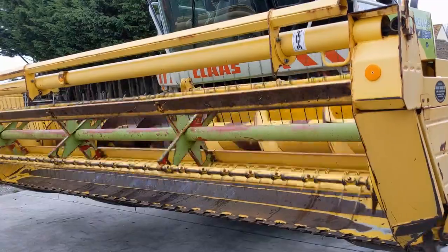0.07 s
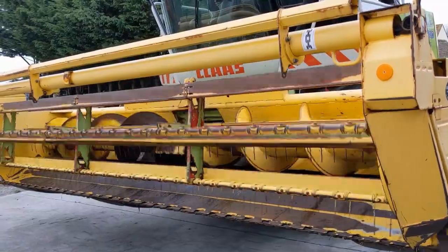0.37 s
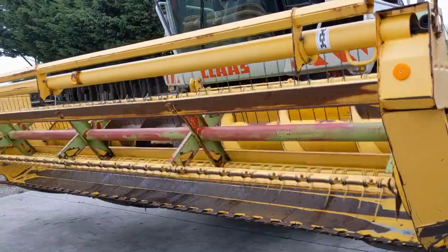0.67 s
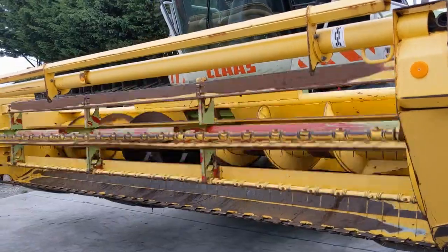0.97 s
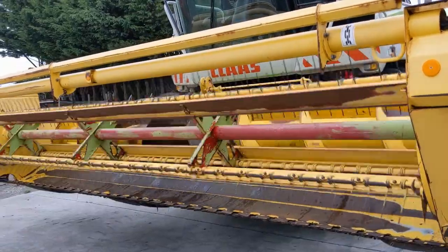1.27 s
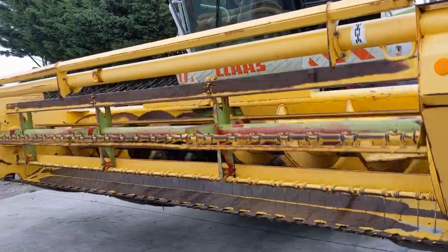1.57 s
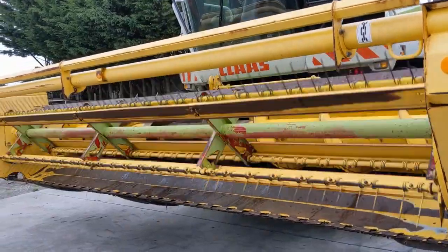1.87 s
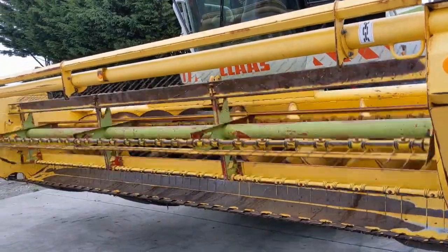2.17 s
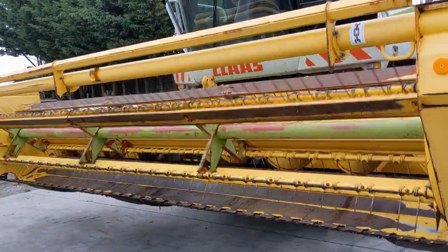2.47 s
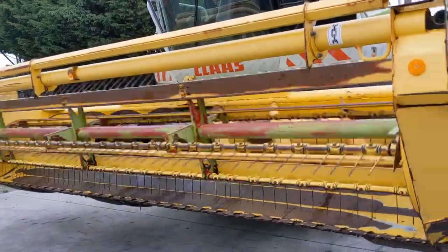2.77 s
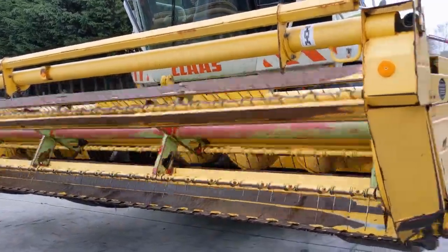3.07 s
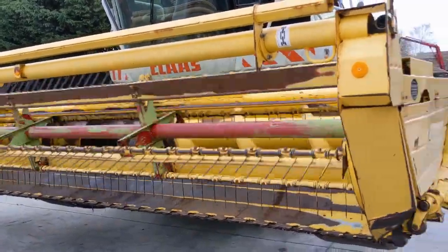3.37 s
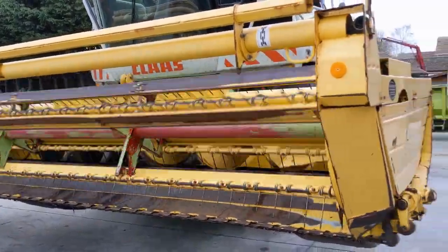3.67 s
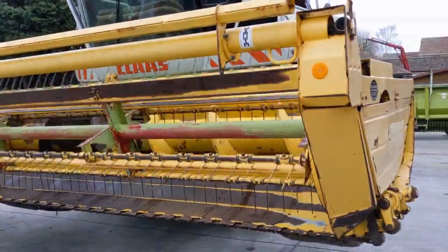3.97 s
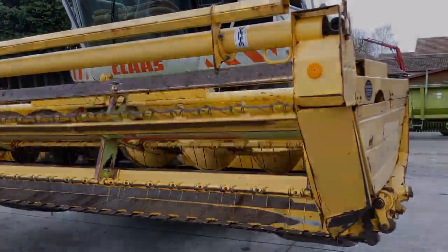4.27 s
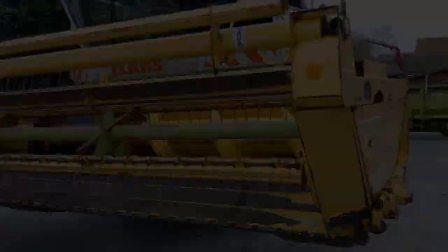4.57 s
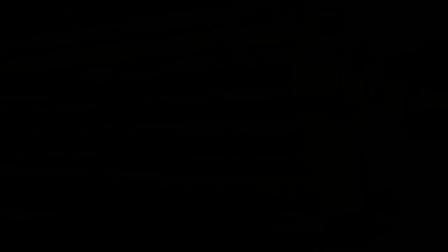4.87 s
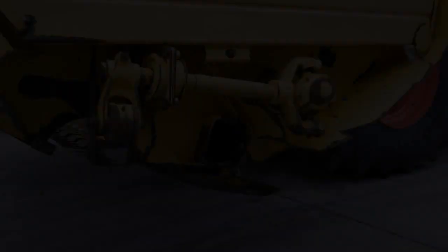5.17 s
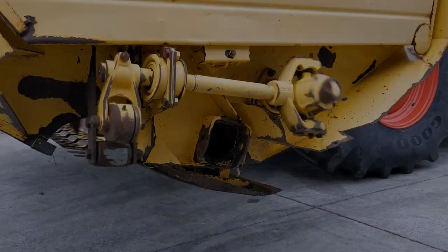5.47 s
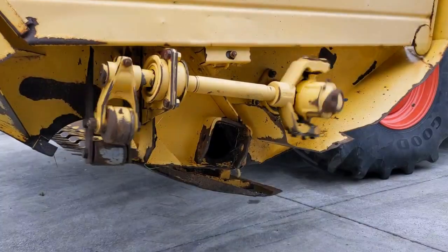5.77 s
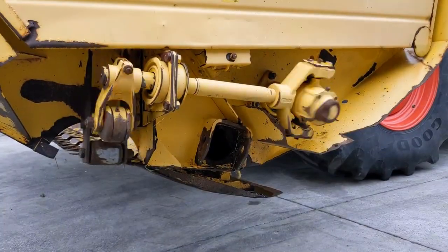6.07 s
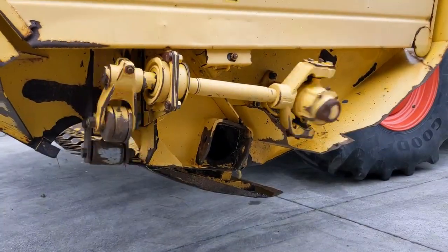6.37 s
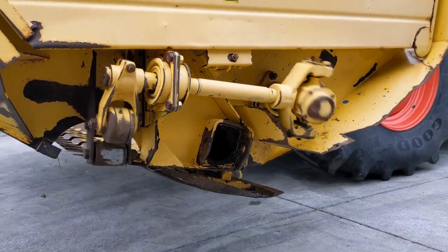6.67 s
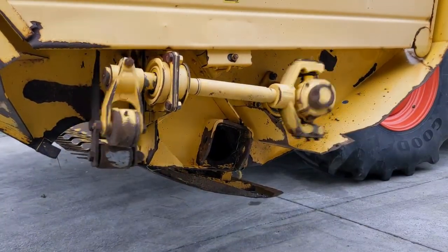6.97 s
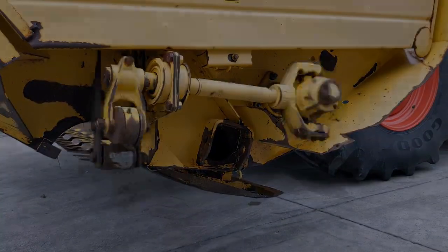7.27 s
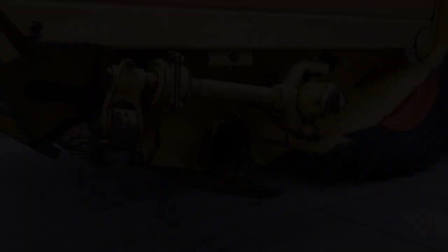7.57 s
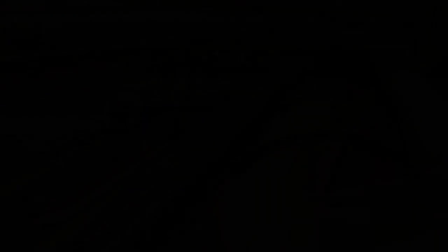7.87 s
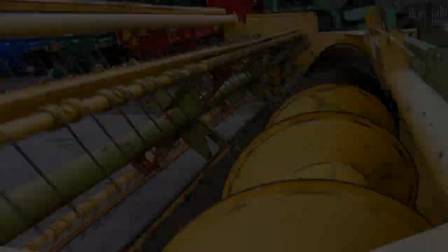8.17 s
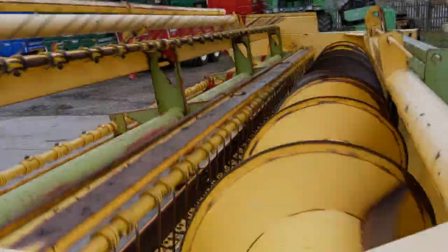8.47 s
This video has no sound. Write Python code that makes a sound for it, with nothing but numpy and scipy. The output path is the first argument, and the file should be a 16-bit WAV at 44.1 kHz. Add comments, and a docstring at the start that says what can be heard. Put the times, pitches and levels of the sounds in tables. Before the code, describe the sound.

A combine harvester's header runs empty in a concrete yard, heard close up from the front. From the start, a steady low engine hum and the drumming of steel panels sit under a dense rattle of chains, reel and auger. The cutter bar's knife scrapes out and back about six times a second, with a short, ringing metallic knock at every stroke, some catching a little harder. At about 5 seconds the sound cuts to silence. It returns at 5.4 seconds, now from the side, at the same pace but with crisper scrapes and more prominent knocking from the drive linkage. Around 7.8 seconds it stutters very briefly and cuts out at 7.9. At about 8.3 seconds the running machine comes back with one dull clunk from the steel trough, and the drone and clatter carry on until about 8.7 seconds.

```python
"""A concrete yard: a combine harvester's header runs empty, heard close up, once from in front and
twice from the side, with short silences between. The engine hums, the steel trough and panels drum,
chains, reel and auger rattle. The cutter bar's knife scrapes out and back six times a second,
knocking its drive linkage at every stroke. Near the end the trough clunks once."""
import sys
import numpy as np
from scipy import signal
from scipy.fft import rfft, irfft, next_fast_len
from scipy.io import wavfile
from scipy.ndimage import uniform_filter1d

SR = 44100
rng = np.random.default_rng(int(sys.argv[2]) if len(sys.argv) > 2 else 0)


def file_out(sig):
    """Save sig as 16-bit WAV at sys.argv[1]."""
    # one column per channel
    cols = np.atleast_2d(sig).T
    # limit, then scale
    lim = np.clip(cols, -1, 1)
    pcm = np.round(lim * 32767).astype(np.int16)
    wavfile.write(sys.argv[1], SR, pcm)


N = 379701
SHAFT_HZ, CRANK_HZ = 49.7, 6.04
MOVE_S = 5.2  # listener goes from front to side

# audible stretches: (start [s], fade-in [s], end [s], first outward stroke [s])
VIEWS = [(.047, .024, 5.029, .08), (5.396, .036, 7.9, 5.476), (8.283, .038, 8.7, 8.398)]


def undb(db):
    """Decibels to gain."""
    return 10 ** (np.asarray(db) / 20)


def level(x, db):
    """Scale to an rms level."""
    return x * undb(db) / np.sqrt(np.mean(x ** 2))


def per_bin(points):
    """Interpolate (frequency [Hz], value) points over log frequency, one value per FFT bin."""
    hz, value = np.transpose(points)
    bin_hz = np.fft.rfftfreq(next_fast_len(N), 1 / SR)
    return np.interp(np.log(bin_hz + 1e-3), np.log(hz), value)


def shape(x, gain):
    """Filter with one gain per FFT bin."""
    size = next_fast_len(N)
    return irfft(rfft(x, size) * gain, size)[..., :N]


def walk(rate_hz):
    """Smooth random drift, deviation near 1."""
    hold = int(SR / rate_hz)
    steps = np.repeat(rng.standard_normal(N // hold + 1), hold)
    return 1.21 * uniform_filter1d(uniform_filter1d(steps, hold), hold)[:N]


def contacts(per_s, spread_db):
    """Two independent trains of tiny metal contacts of random size."""
    hit = rng.random((2, N)) < per_s / SR
    return level(hit * rng.standard_normal((2, N)) * undb(spread_db * rng.standard_normal((2, N))), 0)


def stereo(x, spectrum, alike=1):
    """Colour two independent signals into left and right: the wide machine is alike only lower down."""
    # left-right likeness: (frequency [Hz], correlation [0-1])
    correlation = [(60, .96), (250, .93), (500, 0.96), (850, 0.99), (1150, .75), (1400, .15), (2400, 0.064),
                   (7500, 0.12), (9500, 0.42), (11000, 0.11)]
    likeness = np.clip(per_bin(correlation) * alike, 0, .99)
    gain = undb(per_bin(spectrum))
    mid = shape(x[0], gain * np.sqrt(1 + likeness))
    side = shape(x[1], gain * np.sqrt(1 - likeness))
    return level(np.array([mid + side, mid - side]), 0)


def steel(x, t60_s, ring_db):
    """Each contact sets off a brief wash of crowded treble modes in the steel frame."""
    t = np.arange(SR // 8) / SR
    wash = rng.standard_normal((2, len(t))) * np.exp(-np.log(1000) * t / t60_s)
    wash *= undb(ring_db) / np.sqrt(np.sum(wash ** 2, axis=1, keepdims=True))
    wash = signal.sosfilt(signal.butter(2, 3000, "high", fs=SR, output="sos"), wash)
    return level(x + signal.fftconvolve(x, wash, axes=1)[:, :N], 0)


def engine(front):
    """Hum: harmonics of the governed shaft speed, each wavering a little."""
    # harmonics: (shaft order, level [dB])
    front_orders = [(1, -26.5), (2, -29.5), (4, -25.5), (5, -44), (6, -29), (8, -44.5), (10, -40)]
    side_orders = [(1, -27.5), (2, -36.5), (4, -25.5), (6, -36), (8, -32.5)]

    def hum(orders, waver_db):
        phase = 2 * np.pi * np.cumsum(SHAFT_HZ * (1 + .0015 * walk(3))) / SR
        out = np.zeros(N)
        for order, db in orders:
            peak = np.sqrt(2) * undb(db + waver_db * walk(6.5))
            out += peak * np.sin(order * phase + 2 * np.pi * rng.random())
        return out

    return np.where(front, hum(front_orders, waver_db=2.1), hum(side_orders, waver_db=2.4))


def panels(front, repeat_share, db):
    """Thuds shake the sheet steel; part of the pattern repeats with each crank turn."""
    # trough and panel spectra: (frequency [Hz], relative level [dB])
    front_spectrum = [(22, -32), (38, -19.5), (47, -6), (58, -10.5), (80, 2.5), (120, -2.5), (134, 2.5),
                      (152, -2), (212, -6.5), (236, -1), (292, -3.5), (312, -7), (392, -6), (450, -23.5),
                      (900, -41)]
    side_spectrum = [(22, -32.5), (38, -18), (47, -10), (62, -3.5), (85, 0.5), (115, 3), (150, -2.5),
                     (178, -2), (255, -3), (305, -4.5), (340, -4.5), (440, -16), (490, -26.5), (900, -42.5)]
    thuds = contacts(per_s=2500, spread_db=1)
    repeating = contacts(per_s=2500, spread_db=3)[:, np.arange(N) % int(SR / CRANK_HZ)]
    shake = np.sqrt(1 - repeat_share) * thuds + np.sqrt(repeat_share) * level(repeating, 0)
    ahead = stereo(shake, front_spectrum)
    beside = stereo(shake, side_spectrum, alike=.88)
    return np.where(front, ahead, beside) * undb(db)


def chains(front, front_db, side_db, flutter_db):
    """Links, reel tines and auger flights tick densely and unevenly."""
    # rattle: (frequency [Hz], relative level [dB])
    spectrum = [(250, -9.5), (450, -1), (700, -2.5), (1150, -4), (1500, -9.5), (2100, -9.5), (2450, -4.5),
                (3200, -10.5), (4400, -14.5), (5500, -23.5), (8000, -25), (9700, -29.5), (11000, -35.5),
                (15000, -52.5)]
    ticks = contacts(per_s=7000, spread_db=2) * undb(flutter_db * walk(45))
    rattle = stereo(steel(ticks, t60_s=.033, ring_db=-12), spectrum)
    return rattle * undb(np.where(front, front_db, side_db))


def crank_strokes():
    """Each crank turn drives the knife out and back. Rows: (time [s], scrape [dB], knock [dB])."""
    # outward stroke strength: (time [s], scrape [dB], knock [dB])
    drift = [(0, -20.7, -21.3), (1.2, -21.7, -23), (2.95, -22.9, -23.5), (3.35, -22.4, -18.7),
             (4.5, -24.5, -23), (5.0, -22.7, -21.5), (5.5, -20.5, -17.8), (5.9, -23.8, -21),
             (6.6, -24, -20.3), (7.3, -25.3, -20.7), (7.85, -28, -21.5), (8.4, -22.5, -20),
             (8.6, -27, -20.5)]
    # knife catches harder: (time [s], extra scrape [dB], extra knock [dB])
    hard_strokes = [(.57, 2, 0), (1.07, 1.5, 0), (1.41, 2.5, .5), (3.06, 2, 2), (3.31, 0, 2), (4.05, 3, 0),
                    (4.14, 1, 3), (5.64, 2.5, 1.5), (6.38, 2.5, 0), (7.79, 2.5, 1)]
    # return stroke: (delay [s], extra scrape [dB], extra knock [dB])
    return_front, return_side = (.0845, -1.5, -1.1), (.078, 2.2, 2.0)
    scatter_db = [.7, 1.0]  # scrape, knock
    drift_s, scrape_db, knock_db = np.transpose(drift)
    rows = []
    for _, _, end_s, first_s in VIEWS:
        for s in np.arange(first_s, end_s - .05, 1 / CRANK_HZ):
            outward = np.array([s, np.interp(s, drift_s, scrape_db), np.interp(s, drift_s, knock_db)])
            rows += [outward, outward + (return_front if s < MOVE_S else return_side)]
    rows = np.array(rows)
    rows[:, 1:] += rng.standard_normal((len(rows), 2)) * scatter_db
    for s, *extra_db in hard_strokes:
        nearest = np.argmin(np.abs(rows[:, 0] - s))
        rows[nearest, 1:] += extra_db
    return rows


def swells(times_s, peaks_db, rise_s, fall_s, out_stretch, roundness):
    """A swell of force per stroke; outward strokes drag longer than returns."""
    t, force = np.arange(N) / SR, np.zeros(N)
    for k, (s, db) in enumerate(zip(times_s, peaks_db)):
        near = slice(max(int(s * SR) - SR // 10, 0), int(s * SR) + SR // 10)
        age = (t[near] - s) / (1 if k % 2 else out_stretch)
        width_s = np.where(age < 0, rise_s, fall_s)
        force[near] += undb(db) * np.exp(-np.abs(age / width_s) ** roundness)
    return force


def knife(strokes, front, front_db, side_db, chatter_db):
    """Knife sections scrape through the guard fingers: catch, chatter, ease off."""
    # scrape spectra: (frequency [Hz], relative level [dB])
    front_spectrum = [(400, -9.5), (800, -7.5), (1150, -3), (1500, -10.5), (2450, -3), (3400, -7),
                      (4450, -6.5), (5000, -9.5), (5500, -6.5), (6400, -11.5), (8200, -10.3), (10100, -9),
                      (10700, -15.5), (13500, -17.3), (16000, -30.5)]
    side_spectrum = [(400, -14), (800, -7), (1200, 0), (1550, -10), (2400, -2), (3400, -5.5), (4450, -3),
                     (5700, -8), (6400, -11), (8000, -12.5), (10100, -12), (10800, -16), (13500, -21),
                     (16000, -26.5)]
    times_s, scrape_db, _ = strokes.T
    grit = steel(contacts(per_s=14000, spread_db=1.7), t60_s=.022, ring_db=-4)
    grit *= undb(chatter_db * walk(180))
    ahead = swells(times_s - .0055, scrape_db + front_db,
                   rise_s=.016, fall_s=.025, out_stretch=1.11, roundness=1.45)
    beside = swells(times_s - .003, scrape_db + side_db,
                    rise_s=.0165, fall_s=.018, out_stretch=1.07, roundness=1.18)
    return np.where(front, stereo(grit, front_spectrum) * ahead, stereo(grit, side_spectrum) * beside)


def linkage(strokes, front, front_db, side_db, clack_db, lag_s, idle_db):
    """Joint play is taken up in a burst of knocks at each stroke; knife and linkage ring on."""
    # dry clack of the joints: (frequency [Hz], relative level [dB])
    clack_spectrum = [(700, -17.5), (1150, -5), (1600, -10), (2500, 4), (4400, -0.5), (5800, -5),
                      (7000, -12), (10000, -20.5), (15000, -29.5)]
    # knife and linkage modes: (frequency [Hz], t60 [s], front [dB], side [dB], outward bias [dB])
    modes = [(1900, .03, -12.5, -12, 1.5), (2070, 0.05, -15, -11, 0.5), (2378, .06, 1.5, 3.5, 2),
             (2505, 0.023, 0, -6.5, 0), (2976, .1, -6.5, 4, 4.5), (3134, 0.05, -3.5, 1, -4.5),
             (3778, .03, -3.5, -1.5, 0), (3897, .035, -8.5, -5.5, 2), (4440, 0.04, -5.5, -5, -0.5),
             (5330, 0.026, -13, -10.5, 2), (5600, 0.025, -18, -13, -0.5), (7190, .03, -11, -7.5, -2),
             (8180, .012, -16.5, -12, 1.5), (8970, 0.014, -17, -17, 3.5), (9600, .015, -15.5, -16, -0.5)]
    times_s, _, knock_db = strokes.T
    force = swells(times_s + lag_s, knock_db, rise_s=.0045, fall_s=.012, out_stretch=1.28, roundness=1.3)
    out = stereo(contacts(per_s=6000, spread_db=0), clack_spectrum) * force * undb(clack_db)
    # in front, the loose knife keeps tapping between strokes
    knocks = contacts(per_s=4000, spread_db=1.3) * (force + front * undb(idle_db))
    # out (+1) and back (-1) strike opposite joint faces, favouring different modes
    direction = np.interp(np.arange(N) / SR, times_s, (-1) ** np.arange(len(times_s)))
    for hz, t60_s, ahead_db, beside_db, bias_db in modes:
        pole = np.exp(2j * np.pi * hz / SR - np.log(1000) / (t60_s * SR))
        ring = signal.lfilter([1], [1, -pole], knocks * undb(bias_db * direction)).imag
        out += level(ring, 0) * undb(np.where(front, ahead_db + front_db, beside_db + side_db))
    return out


def clunk(start_s, decay_s, gain_db):
    """One heavier, dull knock in the trough."""
    # struck trough: (frequency [Hz], relative level [dB])
    spectrum = [(150, -17), (330, -1), (600, -6.5), (1100, -6), (1700, -12), (4000, -45)]
    age = np.maximum(np.arange(N) / SR - start_s, 0) / decay_s
    envelope = 2 * np.sqrt(age) * np.exp(-age)
    return stereo(contacts(per_s=4000, spread_db=1), spectrum) * envelope * undb(gain_db)


def fades(t, from_db, cut_db, fall_db_per_s):
    """Each stretch fades in quickly, holds, and cuts out with a faint, short tail."""
    gain = np.zeros(N)
    for start_s, fade_s, end_s, _ in VIEWS:
        rise_db = from_db * np.clip(1 - (t - start_s) / fade_s, 0, 1)
        tail_db = (t > end_s) * (cut_db - fall_db_per_s * (t - end_s))
        gain += (t > start_s) * undb(rise_db + tail_db)
    return gain


def dips(t, depth_db):
    """The level dips briefly, twice."""
    # dips: (start [s], end [s])
    spans = [(4.057, 4.066), (4.995, 5.0)]
    return undb(depth_db * sum((t > start_s) & (t < end_s) for start_s, end_s in spans))


def stutter(x, t, start_s, end_s, piece_s):
    """The sound stutters: one short piece repeats."""
    read_s = np.where((t > start_s) & (t < end_s), start_s + (t - start_s) % piece_s, t)
    return x[:, np.rint(read_s * SR).astype(int)]


def scene():
    """The running machine, from in front, then from beside the knife drive."""
    front = np.arange(N) / SR < MOVE_S
    hum = engine(front)
    drum = panels(front, repeat_share=.22, db=-14.4)
    rattle = chains(front, front_db=-19.3, side_db=-20.3, flutter_db=1.57)
    strokes = crank_strokes()
    scrape = knife(strokes, front, front_db=4.1, side_db=5, chatter_db=1.25)
    knock = linkage(strokes, front, front_db=-32.5, side_db=-31.5,
                    clack_db=-3.5, lag_s=.002, idle_db=-30.5)
    return hum + drum + rattle + scrape + knock + clunk(start_s=8.33, decay_s=.02, gain_db=-16.5)


def record(dry):
    """Two microphone ports, unequal in colour and delay; band limits, soft clip, stutter, fades, dips."""
    # port imbalance: (frequency [Hz], left minus right [dB])
    imbalance = [(60, -3), (110, -3.2), (300, -1.7), (700, -1), (1500, -1.8), (2400, 2.5), (3000, 3.71),
                 (4400, .5), (7200, -1.5), (9500, 2.96), (11000, -2.5), (13000, -9), (16000, -9)]
    left_lag_s, low_hz, top_hz = .0001, 39, 15500
    t = np.arange(N) / SR
    bin_hz = np.fft.rfftfreq(next_fast_len(N), 1 / SR)
    delay = np.exp(-2j * np.pi * bin_hz * np.array([[left_lag_s], [0]]))
    colour = undb(per_bin(imbalance) * np.array([[.5], [-.5]]))
    ports = shape(dry, delay * colour)
    ports = signal.sosfilt(signal.butter(4, low_hz, "high", fs=SR, output="sos"), ports)
    sound = ports / (1 + ports ** 6) ** (1 / 6)  # soft clip
    sound = stutter(sound, t, start_s=7.8, end_s=7.91, piece_s=1 / 30)
    sound *= fades(t, from_db=-30, cut_db=-26, fall_db_per_s=1200) * dips(t, depth_db=-22)
    return signal.sosfilt(signal.ellip(10, .2, 80, top_hz, fs=SR, output="sos"), sound)


dry = scene()
out = record(dry)
file_out(out)
```